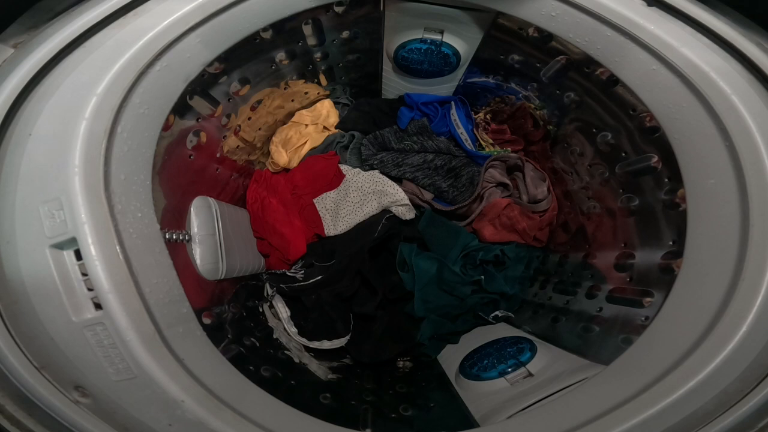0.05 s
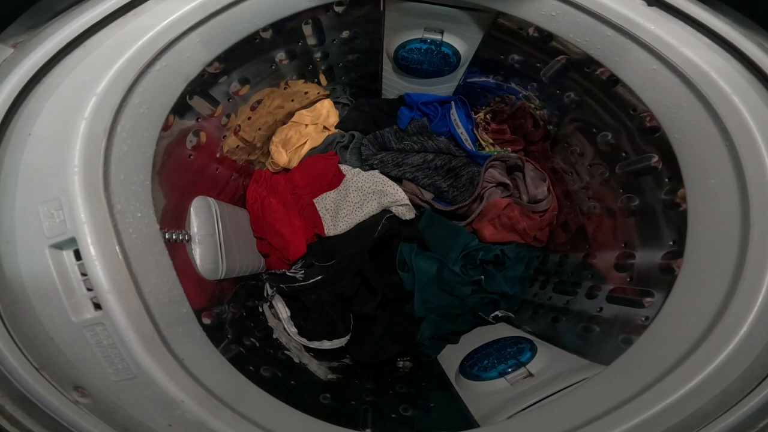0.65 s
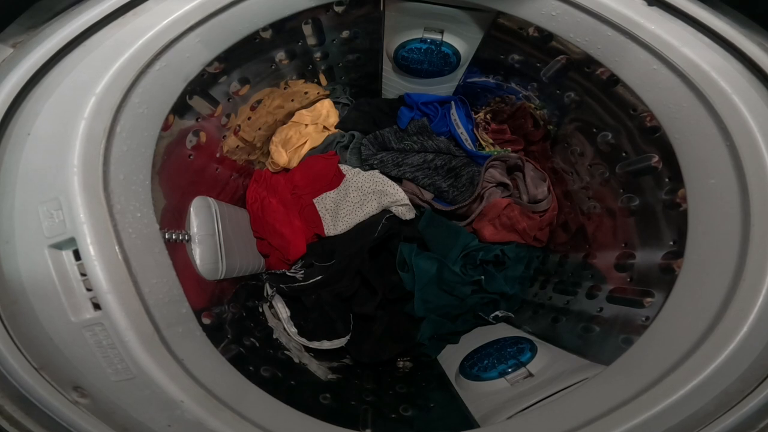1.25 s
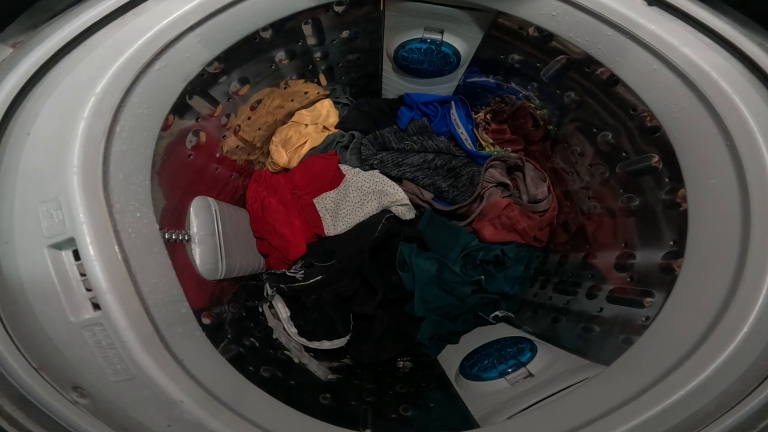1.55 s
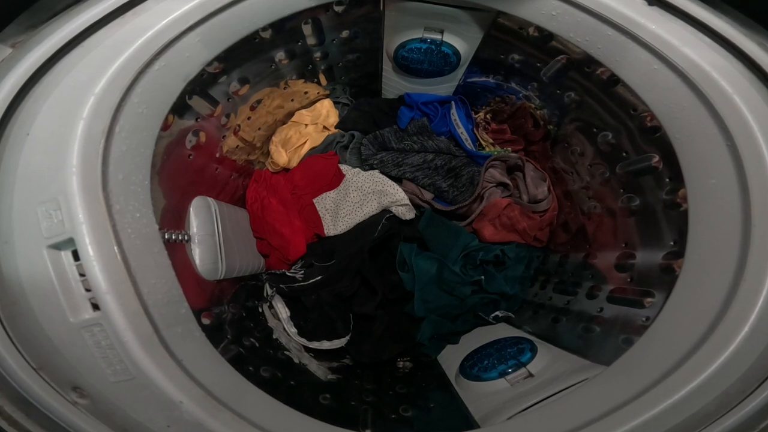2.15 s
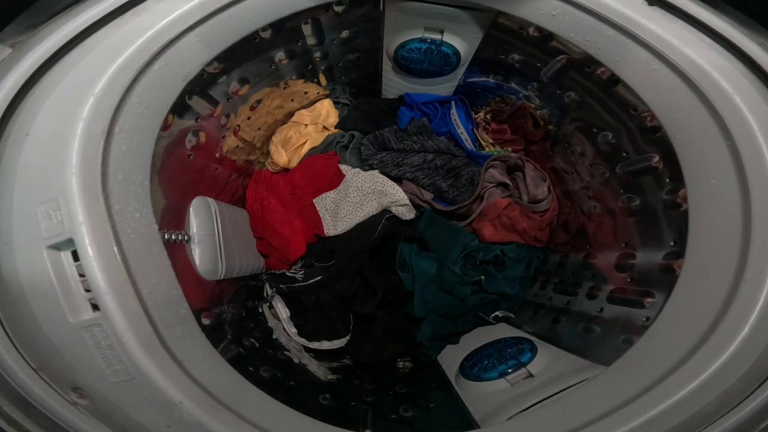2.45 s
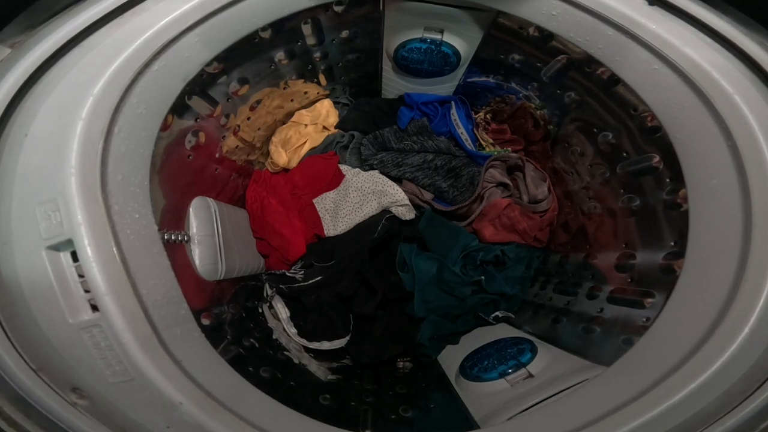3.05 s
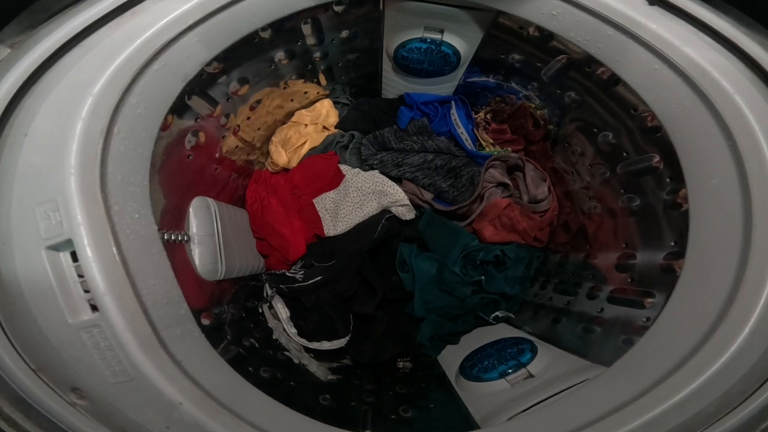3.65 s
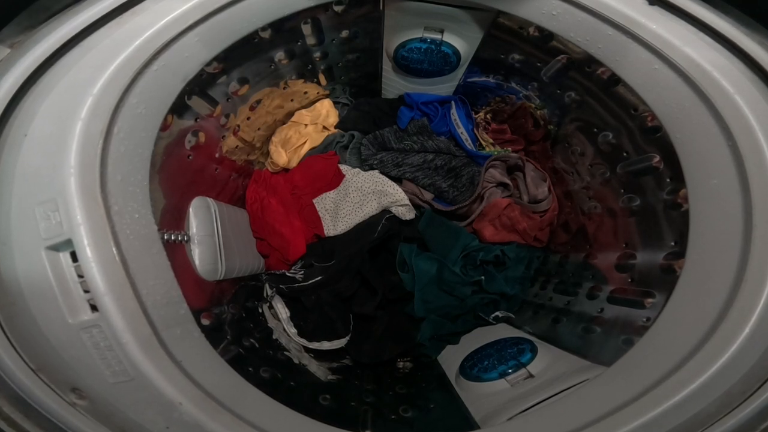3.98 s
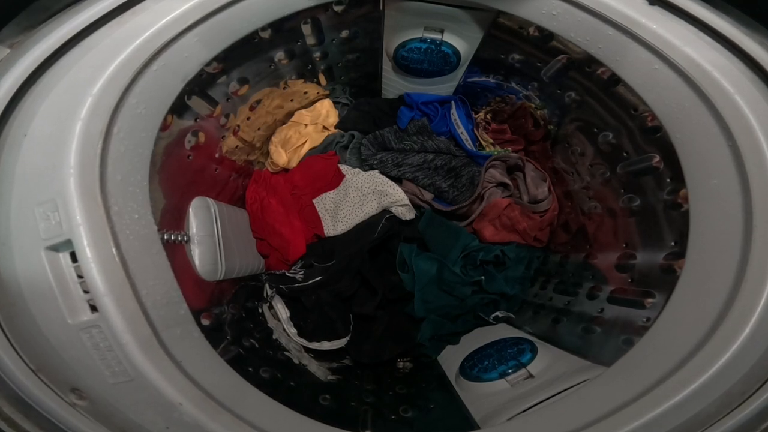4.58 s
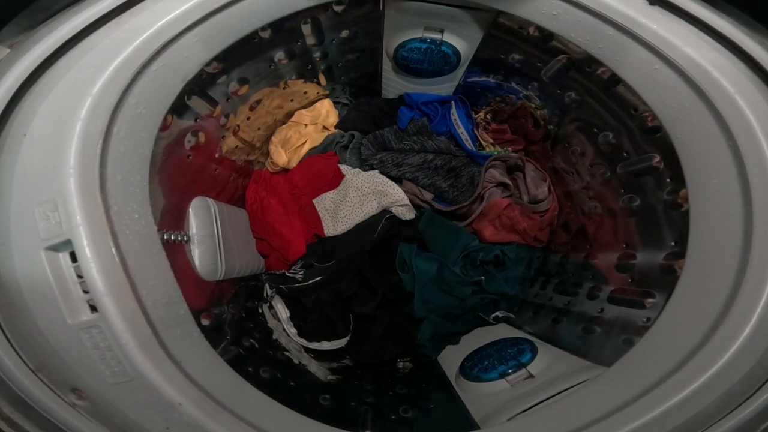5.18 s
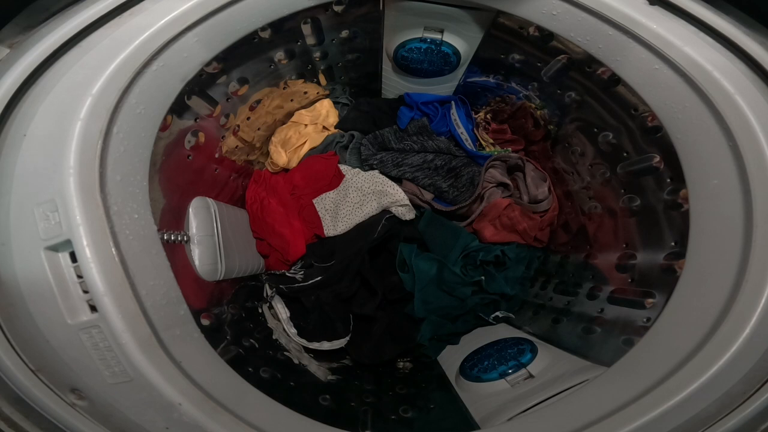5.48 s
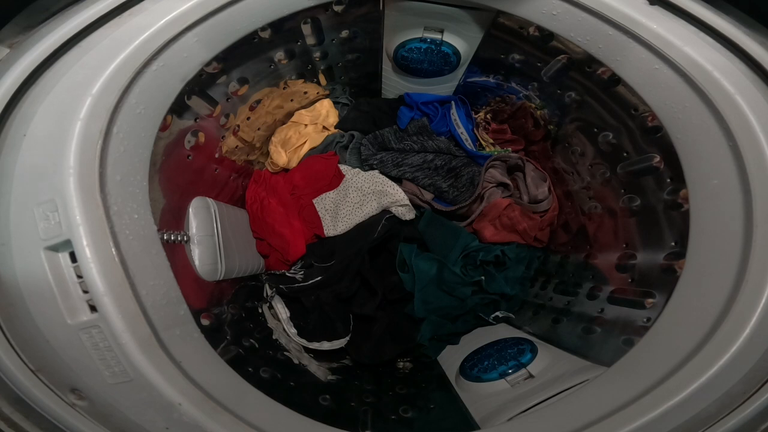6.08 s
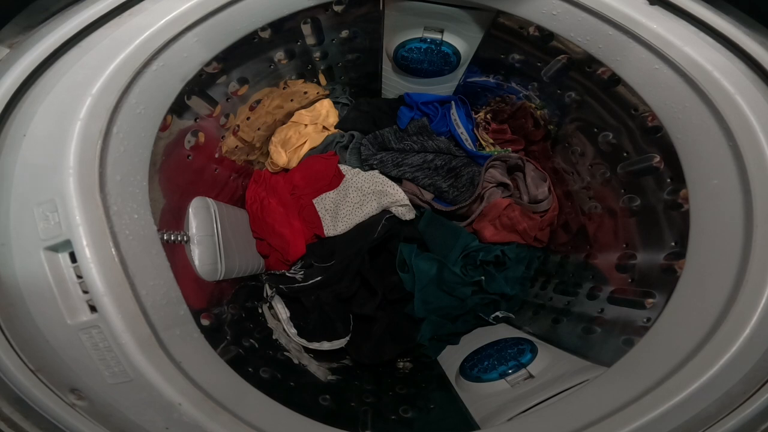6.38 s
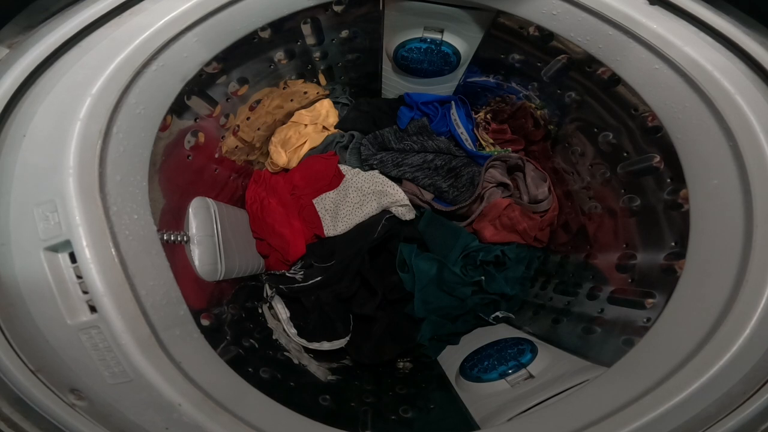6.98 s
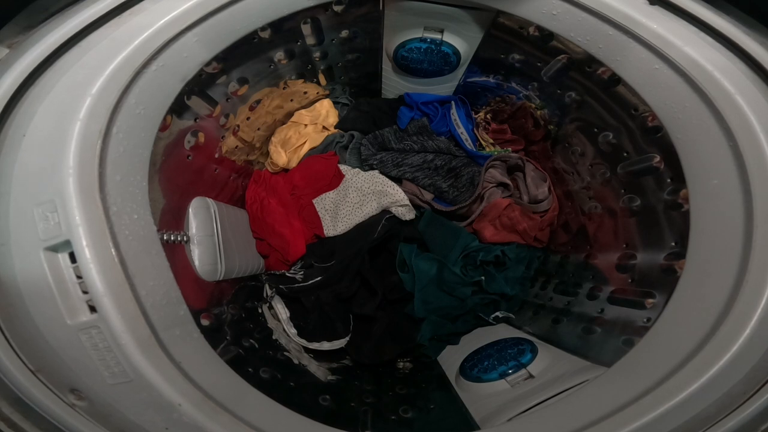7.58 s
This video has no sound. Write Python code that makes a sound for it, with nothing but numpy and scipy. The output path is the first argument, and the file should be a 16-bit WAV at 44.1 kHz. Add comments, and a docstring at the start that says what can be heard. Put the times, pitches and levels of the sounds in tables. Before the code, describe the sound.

Inside the drum of a top-loading washing machine, a few soft drips fall over a faint low murmur and hiss. From about 1.2 seconds the inlet sputters and water dribbles in with small slaps. At 2 seconds a jet arrives suddenly and loudly, drumming on the tub with a quick run of deep, hollow booms until about 2.7 seconds. The water keeps pouring over a low rumble, splashing on wet laundry and churning up ringing, gurgling bubbles, while spray ticks and tinkles on the steel basket. Stronger gushes come between 3.4 and 4.3 seconds. From about 5.3 seconds the flow breaks into uneven spurts and slaps, the spray thins, and small bubbles plip around 6 seconds. The inlet sputters again and the stream cuts off near 6.9 seconds. The tub rumbles briefly, and a few faint drips fall until about 7.5 seconds, leaving the quiet murmur.

```python
"""Washing machine filling

Water runs into a top-loading washer, heard from inside the drum. It dribbles first, then a jet
drums on the tub, splashes, churns up ringing bubbles and sprays the steel basket. The flow breaks
into slaps and stops; the tub rumbles on briefly and a few drips fall."""
import sys
import numpy as np
from scipy import signal
from scipy.fft import rfft, irfft, next_fast_len
from scipy.io import wavfile
from scipy.ndimage import map_coordinates

SR = 44100
rng = np.random.default_rng(int(sys.argv[2]) if len(sys.argv) > 2 else 0)


def store_pcm(level_fs):
    """Save levels as 16-bit WAV."""
    pcm = np.round(np.clip(level_fs, -1, 1) * 32767).astype(np.int16)
    wavfile.write(sys.argv[1], SR, np.atleast_2d(pcm).T)


N = 345303

# Stream strength. Each row: time in seconds, level in dB re nominal flow.
STREAM_DB = [(1.15, -40), (1.3, -26), (1.7, -18.5), (1.8, -13), (1.97, -15), (2.02, 4.5), (2.4, 1.5),
             (3.65, 1.5), (4.0, 1), (5.3, 3), (5.6, -3), (6.2, 0), (6.6, -2), (6.83, -1), (6.95, -25),
             (7.3, -22), (7.45, -46)]
# The stream swells. Each row: start in seconds, length in seconds, gain in dB.
STREAM_GUSHES = [(2.141, 0.019, -5.5), (3.424, 0.23, 2.5), (3.67, 0.11, 4), (3.997, 0.021, 9.5),
                 (4.263, 0.073, 3.5), (5.366, 0.045, 5), (5.778, 0.05, 5.5), (5.894, 0.023, 1),
                 (6.016, 0.06, 3), (6.138, 0.06, 4), (6.495, 0.035, 4.5), (6.752, 0.079, 4)]
# The stream thins or breaks. Each row: start in seconds, length in seconds, loss in dB.
STREAM_BREAKS = [(1.682, 0.089, 13), (2.417, 0.014, 5.5), (2.897, 0.15, 1), (3.287, 0.019, 2),
                 (3.848, 0.03, 0.5), (4.227, 0.017, 4), (4.363, 0.024, 6.5), (4.49, 0.13, 6),
                 (5.33, 0.019, 21), (5.494, 0.029, 8.5), (5.637, 0.036, 2.5), (5.727, 0.027, 8.5),
                 (6.219, 0.025, 10.5), (6.298, 0.18, 6.5), (6.54, 0.036, 9.5), (6.688, 0.02, 7)]
# Bubble cloud under the jet. Each row: time in seconds, relative level in dB, pitch in Hz.
CHURN_TRACK = [(1.8, -44.5, 967), (2.2, -38, 915), (2.5, -29.5, 899), (2.9, -34.5, 951), (3.36, -34, 963),
               (3.47, -31.5, 1072), (3.9, -36, 1135), (4.2, -31.5, 1081), (4.6, -36.5, 1199),
               (5.2, -48, 986), (6.9, -49, 1032)]
# Droplet pitch, set by size. Each row: time in seconds, pitch in Hz.
DROPLET_HZ = [(2.1, 4610), (4.5, 4820), (6.0, 5753), (7.0, 7040)]

# Level curves. Each row: time in seconds, relative level in dB.
FOAM_DB = [(1.5, -42), (2.1, -49.5), (3.35, -52.5), (3.5, -42.5), (3.75, -42), (4.1, -48.5), (5.2, -47.5),
           (6.8, -53.5)]
SPRAY_DB = [(1.9, -66), (2.2, -59.5), (2.4, -48), (3.1, -46.5), (3.6, -50.5), (4.3, -45), (5.3, -50.5),
            (6.0, -59.5), (6.8, -63.5), (7.3, -68)]  # shrinks as the water deepens
TINKLE_DB = [(1.7, -110), (1.95, -75), (2.2, -68), (2.35, -51.5), (3.5, -50.5), (4.2, -51), (5.3, -50),
             (6.2, -60.5), (6.38, -59.5), (6.6, -58.5), (6.85, -62), (6.95, -91), (7.4, -80), (7.7, -105)]
INLET_DB = [(1.2, -105), (1.25, -70), (1.65, -64.5), (1.75, -73), (1.86, -58), (2.07, -56), (2.55, -56),
            (2.75, -63), (6.0, -71.5), (6.3, -69), (6.6, -58.5), (6.85, -58.5), (6.94, -88.5)]

# Lumps landing. Each row: start in seconds, relative peak in dB, centre in Hz, width in octaves.
SLAP_HITS = [(.022, -57, 720, .3), (.085, -44.5, 537, 0.32), (.157, -44.5, 340, 0.45),
             (.18, -44, 290, 0.45), (0.223, -58, 1010, 0.28), (.255, -62, 2300, .4), (.728, -57, 2350, .35),
             (1.245, -43.5, 2240, 0.81), (1.301, -37.5, 1230, 0.7), (1.376, -48.5, 1310, 1),
             (1.434, -38.5, 950, 0.19), (1.492, -44, 790, .6), (1.522, -46, 1500, 0.98),
             (1.555, -40.5, 1340, 0.84), (1.62, -44, 1280, 1), (1.77, -32.5, 1390, 0.6),
             (1.804, -36, 1064, 0.17), (1.853, -37, 1120, 0.38), (1.858, -38, 475, 0.76),
             (1.898, -33.5, 1120, 0.7), (1.974, -37.5, 1980, 0.65), (2.014, -26, 422, 0.6),
             (2.055, -24.5, 535, 0.64), (2.121, -21, 593, 0.6), (2.146, -20, 630, 0.78),
             (2.186, -20, 630, 0.97), (2.442, -30, 753, 0.4), (2.489, -23.5, 847, 0.12),
             (2.818, -20, 890, 0.23), (3.043, -24.5, 916, 0.18), (3.114, -21, 828, 0.62),
             (3.218, -23, 910, 0.23), (3.343, -22, 966, 0.2), (3.485, -22, 1134, 0.32),
             (3.587, -21.5, 1044, 0.19), (3.712, -20, 1240, 0.95), (3.915, -20.5, 1135, 0.24),
             (3.949, -34, 1135, 0.23), (3.985, -18, 1180, 0.25), (4.012, -15, 1123, 0.29),
             (4.121, -17.5, 1043, 0.32), (4.171, -15, 1090, 0.31), (4.279, -22.5, 1094, 0.24),
             (4.364, -25.5, 1104, 0.54), (4.404, -38, 1098, .5), (4.627, -26.5, 1185, 0.47),
             (4.681, -22.5, 1010, .5), (4.72, -24, 950, 0.17), (5.3, -20, 740, 0.75),
             (5.372, -26, 764, 0.66), (5.478, -29.5, 794, 0.7), (5.547, -26, 682, 0.95),
             (5.698, -30, 803, 0.24), (5.787, -27, 1090, 0.47), (5.913, -27, 960, .25),
             (6.195, -29.5, 1000, .6), (6.265, -27, 955, 0.65), (6.283, -33.5, 1200, .6),
             (6.508, -25.5, 987, 0.2), (6.774, -30, 1290, 0.41), (7.286, -46, 1310, 0.56)]
# Spurts on the steel. Each row: start in seconds, relative level in dB.
SPURT_HITS = [(1.852, -60.5), (1.897, -57), (1.973, -57), (2.054, -34), (2.137, -44), (2.177, -39),
              (2.239, -43), (2.325, -42), (2.359, -41), (2.402, -33.5), (2.459, -37.5), (2.55, -35.5),
              (2.616, -28.5), (2.695, -47.5), (2.726, -38.5), (2.77, -29.5), (2.847, -36.5), (3.058, -34),
              (3.084, -32.5), (3.137, -56), (3.259, -29), (3.344, -45), (3.448, -32.5), (3.487, -26),
              (3.548, -30), (3.6, -37), (3.706, -26), (3.74, -34.5), (3.83, -39.5), (4.014, -39),
              (4.266, -37), (4.309, -40.5), (4.43, -47), (4.523, -38.5), (4.69, -47.5), (4.786, -41.5),
              (4.885, -46), (4.959, -42.5), (4.991, -41), (5.028, -39.5), (5.21, -41.5), (5.299, -37),
              (5.37, -34), (5.392, -39.5), (5.545, -40), (5.617, -39.5), (5.698, -50), (5.786, -45),
              (5.889, -41), (5.969, -44), (6.046, -51), (6.129, -46), (6.19, -46.5), (6.26, -43),
              (6.283, -56), (6.476, -51), (6.51, -61), (6.76, -56), (7.096, -62.5), (7.12, -64)]
# Pitched events. Each row: start in seconds, relative peak in dB, pitch in Hz.
BOOM_HITS = [(1.319, -54, 159), (1.566, -37, 144), (1.777, -31, 147), (1.816, -37, 139),
             (2.012, -10.5, 150.5), (2.067, -15, 147), (2.118, -21, 143.3), (2.192, -9.5, 151),
             (2.24, -19, 140.4), (2.281, -12.5, 134.8), (2.342, -16, 119.7), (2.484, -13, 151),
             (2.601, -20.5, 136), (2.655, -18, 142)]
DRIP_HITS = [(0.084, -50, 513), (0.124, -47, 1035), (.155, -43.5, 369), (.175, -43, 254), (.226, -50, 475),
             (5.88, -40, 1880), (6.001, -35, 1730), (6.031, -35, 1840), (6.161, -32, 1634),
             (6.177, -43, 1660), (6.28, -33.5, 1900), (6.922, -54.5, 6800), (7.012, -59, 1600),
             (7.018, -55, 6800), (7.07, -55, 1620), (7.109, -55, 1280), (7.278, -51, 1614),
             (7.135, -61, 7200), (7.324, -58, 7100), (7.44, -55.5, 6600)]

# Resonances. Each row: frequency in Hz, bandwidth in Hz, gain in dB.
AIR_MODES = [(228, 33, -1), (287, 19, -3), (344, 14, 0), (413, 57, -1), (541, 24, 5), (588, 35, -2),
             (648, 35, -3), (697, 45, 1), (850, 23, -4), (938, 75, -2), (1022, 62, -4), (1078, 19, 0),
             (1138, 18, -2), (1210, 39, 1), (1265, 34, -4), (1403, 24, 0), (1484, 36, 3), (1636, 40, 1),
             (1706, 65, -5), (1900, 40, -1), (2032, 50, -4), (2175, 50, -3), (2335, 49, 3), (2550, 90, -1)]  # air in the drum
TUB_MODES = [(98, 18, -8.5), (121.6, 25, -6.5), (138.8, 14, -0.5), (168.6, 8.3, 1)]
BASKET_MODES = [(2937, 34, -12), (3070, 80, -9), (3475, 31, -10), (3687, 14, -12), (3785, 32, 3),
                (3850, 64, -6), (3965, 140, -6), (4323, 35, -1), (4584, 78, -8), (4758, 73, -3),
                (4850, 31, -8), (5126, 48, -7), (5241, 36, -8), (5337, 52, -1), (5415, 38, -8),
                (5873, 54, -8), (6138, 57, -9), (6477, 97, -7), (6876, 52, -8), (7102, 153, 1),
                (7292, 34, -3), (7523, 45, -12), (7858, 94, -9), (8350, 60, -12)]
CLEAR_MODES = [(3780, 26, 0), (3860, 90, -4), (4328, 40, -4)]  # the basket's clearest
HIGH_MODES = [(4325, 35, -3), (4570, 70, -9), (4765, 70, -6), (5135, 45, -7), (5335, 50, -1),
              (5420, 45, -6), (5870, 45, -10), (6476, 50, -12), (6872, 35, -8), (7125, 90, -1),
              (7295, 35, -3)]  # the basket's high ones

# Spectral shapes. Each row: frequency in Hz, gain in dB.
SPLASH_EQ = [(100, -48.5), (200, 2.5), (350, 3), (700, -5.5), (900, -2), (1400, -17.5), (2000, -36),
             (3000, -34), (8000, -76)]
FOAM_EQ = [(600, -55.5), (1200, 0.5), (1500, 10), (1750, -2), (2100, -7), (2600, -8), (3200, -6.5),
           (5000, -24), (9000, -40.5), (12500, -61.5)]
PANEL_EQ = [(50, -22), (80, -8.5), (110, -1), (175, 0.5), (205, -10.5), (240, -10.5), (290, -27.5),
            (600, -71.5)]
HEAVE_EQ = [(10, -32.5), (25, -11), (36, -16), (50, -2), (75, -11), (100, -6), (160, -60), (300, -100)]
SPRAY_EQ = [(1200, -70), (2500, -22), (3100, -3.5), (3700, -5), (5400, -6), (7400, -7), (8000, -12.5),
            (9200, -13), (10200, -29.5), (12500, -23), (14000, -67)]
SPURT_EQ = [(2200, 6), (3100, -3), (3900, 5.5), (5000, 3), (7300, 1), (9000, -6)]  # re the even spray
INLET_EQ = [(1000, -34.5), (1900, 3.5), (2350, 4), (2600, -1.5), (3300, -21), (4500, -6), (8000, -12),
            (11000, -40), (13000, -58.5)]
MURMUR_EQ = [(12, -38), (20, -27), (41, 5), (81, -11), (113, -0.5), (150, 0.5), (182, -7.5), (200, -16.5),
             (247, -20), (300, -37.5), (390, -60), (660, -120)]
ROOM_EQ = [(60, -3), (200, 1), (300, -3), (500, -7.5), (750, -16), (1200, -11.5), (1750, -6.5),
           (2400, -13.5), (2750, -18.5), (3400, -10), (4500, -22.5), (7000, -20), (8500, -21.5),
           (11000, -43), (13900, -57.5)]

# Stereo image. Each row: frequency in Hz, gain in dB.
BALANCE_EQ = [(30, -10), (140, -7.5), (300, -1), (520, -0.5), (660, 8), (800, -1.5), (1000, 4.5), (1800, 4),
              (2200, 1), (3600, -1), (4000, -6), (4500, -1), (7000, 0)]  # left minus right
SIDE_ECHO_EQ = [(50, -49.5), (150, -34.5), (280, -15.5), (500, -9), (1500, -18.5), (2300, -10), (3000, 1.5),
                (4200, -6.5), (7000, -18), (12000, -14.5)]  # echo in the side channel
ROOM_SIDE_EQ = [(50, -20), (120, 6.5), (200, 2.5), (300, -1), (1000, -1), (1700, -5), (3000, -6),
                (5000, -6), (9000, -11), (12000, 12.5)]  # side minus mid


def splash(lumps, surge, fine_surge, splash_db=-38, foam_db=-2):
    """Heavy drops land on water and wet cloth; foam crackles around them."""
    heavy = driven(patter(1200, 5.8) * lumps, flow() * surge,
                   lambda hz: colour(SPLASH_EQ, hz) * resonances(AIR_MODES, hz))
    foam = driven(patter(1600, 4.2) * lumps, flow() * fine_surge * amp(curve(FOAM_DB)),
                  lambda hz: colour(FOAM_EQ, hz) * resonances(AIR_MODES, hz))
    return amp(splash_db) * heavy + amp(foam_db) * foam


def churn(lumps, surge, gain_db=-2.5, wander=0.02):
    """A cloud of like-sized bubbles gurgles where the jet plunges in."""
    pitch_hz = curve(CHURN_TRACK, column=2) * (1 + wander * wobble(knots_per_s=14))
    gurgle = cloud(pitch_hz, scatter=0.058, cycles=4.4, rise=0.016, spread_db=3, count=2600, samples=1200)
    gain = flow() * surge * amp(curve(CHURN_TRACK))
    return amp(gain_db) * driven(gurgle * lumps, gain, lambda hz: resonances(AIR_MODES, hz, direct=0.072))


def slaps(gain_db=-1, attack_s=0.0015, fade_s=0.0125):
    """Lumps of water smack on cloth and pool and ring the drum's air."""
    track, t = np.zeros(N), np.arange(SR // 5) / SR
    hz = np.fft.rfftfreq(len(t), 1 / SR) + 1
    air = resonances(AIR_MODES, hz, direct=0.4)
    for start_s, db, centre_hz, octaves in SLAP_HITS:
        burst = rng.standard_normal(len(t)) * pulse(t, attack_s, fade_s)
        band = 1 / (1 + 1j * (hz / centre_hz - centre_hz / hz) / octaves / 2) ** 4
        smack = irfft(rfft(burst) * air * band)
        add(track, start_s, amp(db + gain_db) * smack / np.abs(smack).max())
    return track


def rumble(surge, panel_db=-25.5, heave_db=-27.5, knee_db=-7.5, arrival_s=2.02, heave_lag_s=0.029):
    """The jet drums on the tub's panels, hardest on arrival, and rocks the mass of water."""
    t = np.arange(N) / SR
    drive = flow() / np.hypot(flow(), amp(knee_db))  # saturates above the knee
    panels = unit(filtered(patter(2500, 0.92),
                           lambda hz: colour(PANEL_EQ, hz) * resonances(TUB_MODES, hz, direct=0.56)))
    arrival_db = 10 * (t > arrival_s) * np.exp(-((t - arrival_s) / 0.18) ** 2)
    panel_gain = settled(amp(arrival_db) * drive ** 1.64 * surge ** 0.72, settle_s=0.045)
    heave = unit(filtered(patter(800, 1), lambda hz: colour(HEAVE_EQ, hz)))
    heave_gain = settled(np.interp(t - heave_lag_s, t, drive) ** 1.23, settle_s=0.082)
    inertia_db = np.interp(t, [2.3, 2.377], [-7, 0])  # the mass of water is slow to start rocking
    return amp(panel_db) * panel_gain * panels + amp(heave_db + inertia_db) * heave_gain * heave


def booms(gain_db=-2, sag=0.046, attack_s=0.01, fade_s=0.034):
    """The jet's first weight rings the tub's wall, which sags in pitch under the load."""
    track, t = np.zeros(N), np.arange(SR // 3) / SR
    envelope = pulse(t, attack_s, fade_s)
    for start_s, db, hz in BOOM_HITS:
        phase = 2 * np.pi * hz * t * (1 - sag * np.tanh(t / fade_s / 2))
        add(track, start_s, amp(db + gain_db) * np.sin(phase) * envelope / envelope.max())
    return track


def spray(lumps, fine_surge, gain_db=-5, ring_db=-3, graze_s=3.27, muffle_db_per_s=12.5):
    """Droplets tick and plink on the basket; a graze swells its ring, then rising water damps it."""
    gain = amp(gain_db + curve(SPRAY_DB)) * flow() * fine_surge
    plinks = cloud(curve(DROPLET_HZ), scatter=0.236, cycles=11, rise=0.0045, spread_db=-5,
                   count=9000, samples=300)
    drops = (unit(plinks) + unit(patter(2600, 3.3))) * lumps
    ticks = driven(drops, gain, lambda hz: steel(BASKET_MODES, hz, direct=0.1))
    ring = unit(filtered(drops, lambda hz: resonances(CLEAR_MODES, hz) ** 2))
    since_s = np.arange(N) / SR - graze_s
    graze_db = 10 * np.exp(-np.abs(since_s) / 0.08)
    muffle_db = muffle_db_per_s * np.maximum(since_s, 0)
    return ticks + amp(ring_db + graze_db - muffle_db) * gain * ring


def spurts(gain_db=-2, plink_hz=4915, plink_db=-3, grain_db=5, air_db=-15, attack_s=0.0092, fade_s=0.0081):
    """Handfuls of droplets ring the basket and the air inside it; weaker stragglers trail each."""
    track, t = np.zeros(N), np.arange(SR // 8) / SR
    hz = np.fft.rfftfreq(len(t), 1 / SR)
    upper_air = resonances([mode for mode in AIR_MODES if mode[0] > 1800], hz)
    body = (steel(BASKET_MODES, hz, direct=0.08) + amp(air_db) * upper_air) * colour(SPURT_EQ, hz)
    envelope = pulse(t, attack_s, fade_s)
    gain = amp(gain_db) * np.std(envelope) / envelope.max()
    for start_s, db in SPURT_HITS:
        for late_s, trail_db in [(0, 0), (0.018 * (0.5 + rng.random()), -8.5)]:
            noise, size = rng.standard_normal((2, len(t)))
            grains = unit(noise * amp(grain_db * size) * envelope)
            age_s = np.maximum(t - 2 * fade_s * rng.random((7, 1)), 0)
            pitch_hz = plink_hz * np.exp(0.1776 * np.clip(rng.standard_normal((7, 1)), -2, 2))
            plinks = unit(bubble(age_s, pitch_hz, cycles=10, rise=0).sum(axis=0))
            burst = irfft(rfft(grains + amp(plink_db) * plinks) * body)
            add(track, start_s + late_s, gain * amp(db + trail_db) * unit(burst))
    return track


def tinkle(surge):
    """Flurries of fine drops ring the basket's high modes."""
    flurries = clumps(per_s=45, life_s=0.014, steady=0.3)
    drops = cloud(curve(DROPLET_HZ), scatter=0.224, cycles=5, rise=0, spread_db=4.2,
                  count=3800, samples=300)
    ringing = filtered(drops * surge * flurries, lambda hz: steel(HIGH_MODES, hz, direct=0.11))
    return amp(curve(TINKLE_DB)) * unit(ringing)


def glugs(surge, glug_hz=1198, glug_db=-49, plop_hz=629, plop_db=-51):
    """Small and large bubbles in the pool merge into a slosh and ring the drum's air."""
    small = cloud(np.full(N, glug_hz), scatter=0.24, cycles=6, rise=0.015, spread_db=3,
                  count=2400, samples=1200)
    large = cloud(np.full(N, plop_hz), scatter=0.33, cycles=4, rise=0.015, spread_db=4,
                  count=1100, samples=1600)
    slosh = amp(glug_db) * unit(small) + amp(plop_db) * unit(large)
    return np.std(slosh) * driven(slosh, flow() * surge, lambda hz: resonances(AIR_MODES, hz, direct=0.14))


def drips(gain_db=-1, cycles=8, rise=0.018, shed_within_s=0.023):
    """Single bubbles plip in the pool, each shedding three weaker ones; the drum's air rings."""
    track, t = np.zeros(N), np.arange(SR // 4) / SR
    air = resonances(AIR_MODES, np.fft.rfftfreq(len(t), 1 / SR), direct=0.44)
    for start_s, db, hz in DRIP_HITS:
        plip = bubble(t, hz, cycles, rise)
        for delay, detune in rng.random((3, 2)):
            shed_hz = hz * (1 + 0.31 * (detune - 0.5))
            add(plip, shed_within_s * delay, 0.55 * bubble(t, shed_hz, cycles / 2, rise))
        plip = irfft(rfft(plip) * air)
        add(track, start_s, amp(db + gain_db) * plip / np.abs(plip).max())
    return track


def inlet(lumps):
    """Air sputters in the inlet as the pipe fills and again as it empties."""
    sputter = filtered(patter(4400, 13) * lumps,
                       lambda hz: colour(INLET_EQ, hz) * resonances(AIR_MODES, hz, direct=0.48))
    return amp(curve(INLET_DB)) * unit(sputter)


def murmur(level_db=-49, sway_db=2, period_s=1, trough_s=0.86):
    """The resting machine's low murmur swells and sinks."""
    sway = -np.cos(2 * np.pi * (np.arange(N) / SR - trough_s) / period_s)
    noise = unit(filtered(rng.standard_normal(N), lambda hz: amp(along(MURMUR_EQ, hz))))
    return amp(level_db + sway_db * sway) * noise


def room(level_db=-64):
    """Faint stereo hiss of the laundry room, diffuse above the bass."""
    mid, side = filtered(rng.standard_normal((2, N)),
                         lambda hz: amp([along(ROOM_EQ, hz), along(ROOM_EQ, hz) + along(ROOM_SIDE_EQ, hz)]))
    return amp(level_db) * unit(np.array([mid + side, mid - side]))


def flow():
    """Stream strength, 1 at nominal flow."""
    return amp(curve(STREAM_DB))


def gushes_and_breaks(rise_s=0.02, fall_s=0.0074):
    """Gain of the uneven stream, which falls faster than it rises."""
    t = np.arange(N) / SR

    def gate(start_s, length_s, in_s, out_s):
        return np.clip((t - start_s) / in_s, 0, 1) * np.clip(1 - (t - start_s - length_s) / out_s, 0, 1)

    gush_db = sum(db * gate(s, length_s, rise_s, fall_s) for s, length_s, db in STREAM_GUSHES)
    loss_db = sum(db * gate(s, length_s, fall_s, rise_s) for s, length_s, db in STREAM_BREAKS)
    return amp(gush_db - loss_db)


def patter(per_s, spread_db):
    """Randomly timed impacts of uneven size."""
    chance, size, sign = rng.random(N), rng.standard_normal(N), rng.choice([-1, 1], N)
    return (chance < per_s / SR) * sign * amp(spread_db * np.clip(size, -2, 2))


def clumps(per_s, life_s, steady):
    """Gain of water arriving in lumps: jumps that die away, over a steady share of the power."""
    power = signal.lfilter([1], [1, -np.exp(-2 / (life_s * SR))], patter(per_s, 2) ** 2)
    return np.sqrt(steady + (1 - steady) * power / power.mean())


def bubble(t, hz, cycles, rise):
    """A bubble rings and climbs in pitch as it nears the surface."""
    life_s = cycles / hz
    phase = 2 * np.pi * hz * t * (1 + rise * np.tanh(t / life_s / 2))
    return np.sin(phase) * pulse(t, 1 / hz, life_s)


def cloud(centre_hz, scatter, cycles, rise, spread_db, count, samples):
    """Many bubbles of random start, pitch, life and strength."""
    life, strength, pitch = np.clip(rng.standard_normal((count, 3)), -2, 2).T
    start, offset = rng.integers(0, N, count), np.arange(samples)
    hz = centre_hz[start] * np.exp(scatter * pitch)
    rings = bubble(offset / SR, hz[:, None], cycles * amp(2 * life)[:, None], rise)
    rings *= amp(spread_db * strength)[:, None]
    return np.bincount((start[:, None] + offset).ravel(), rings.ravel(), minlength=N)[:N]


def resonances(modes, hz, direct=0):
    """Response of parallel resonances plus a direct path."""
    f = np.arange(0, SR / 2, 2)
    response = sum(amp(db) * 1j * f * width / (centre ** 2 - f ** 2 + 1j * f * width)
                   for centre, width, db in modes)
    return direct + np.interp(hz, f, response)


def steel(modes, hz, direct):
    """The basket's response to a droplet."""
    return colour(SPRAY_EQ, hz) * resonances(modes, hz, direct)


def echoes(x, t60_s):
    """Short dense tail from the drum's walls."""
    t = np.arange(SR // 3) / SR
    tail = rng.standard_normal(len(t)) * amp(-60 * t / t60_s) * (t > 0.002)
    return signal.fftconvolve(x, tail / np.linalg.norm(tail))[:N]


def settled(drive, settle_s):
    """Level of a body that stores its drive's energy and releases it slowly."""
    keep = np.exp(-1 / (settle_s * SR))
    return np.sqrt(signal.lfilter([1 - keep], [1, -keep], drive ** 2))


def driven(excitation, gain, response):
    """Filter excitation * gain, scaled so that gain 1 gives rms 1."""
    steady, played = filtered(np.array([excitation, excitation * gain]), response)
    return played / np.std(steady)


def filtered(x, response):
    """Apply a complex response, a function of Hz."""
    size = 2 * next_fast_len(N // 2 + SR // 4)
    return irfft(rfft(x, size) * response(np.fft.rfftfreq(size, 1 / SR)), size)[..., :N]


def colour(points, hz):
    """Minimum-phase response through (Hz, dB) points."""
    cepstrum = irfft(np.log(amp(along(points, hz))))
    half = len(cepstrum) // 2
    cepstrum[1:half] *= 2
    cepstrum[half + 1:] = 0
    return np.exp(rfft(cepstrum))


def along(points, hz):
    """Read (Hz, dB) points on a log frequency axis."""
    point_hz, db = np.transpose(points)
    return np.interp(np.log(hz + 1), np.log(point_hz + 1), db)


def curve(rows, column=1):
    """One column of a time table, per sample."""
    rows = np.asarray(rows)
    return np.interp(np.arange(N) / SR, rows[:, 0], rows[:, column])


def wobble(knots_per_s):
    """Smooth random curve."""
    return map_coordinates(rng.standard_normal(400), [np.arange(N) * knots_per_s / SR], mode="wrap")


def pulse(t, attack_s, fade_s):
    """Exponential attack and decay."""
    return np.exp(-t / fade_s) * (1 - np.exp(-t / attack_s))


def add(track, start_s, sound):
    """Mix a sound into a track."""
    part = track[round(start_s * SR):][:len(sound)]
    part += sound[:len(part)]


def amp(db):
    """Decibels to gain."""
    return 10 ** (np.asarray(db) / 20)


def unit(x):
    """Scale to rms 1."""
    return x / np.sqrt(np.mean(x ** 2) + 1e-20)


def scene(echo_db=-10):
    """Water falls left of centre; the drum's echoes reach the two sides differently."""
    lumps = clumps(per_s=80, life_s=0.023, steady=0.19)
    fine_lumps = unit(np.sqrt(lumps) * clumps(per_s=65, life_s=0.022, steady=0.28))
    surge = gushes_and_breaks()
    fine_surge = surge ** 1.7  # foam and spray swing further than the stream
    water = splash(lumps, surge, fine_surge) + churn(np.sqrt(lumps), surge) + inlet(lumps) + slaps()
    water += spray(fine_lumps, fine_surge) + spurts() + tinkle(surge) + glugs(surge) + drips()
    tub = rumble(surge) + booms() + murmur()
    mid = water + amp(echo_db) * echoes(water, t60_s=0.26)
    side = filtered(echoes(water + tub, t60_s=0.071), lambda hz: amp(along(SIDE_ECHO_EQ, hz)))
    stereo = filtered(np.array([mid + side, mid - side]),
                      lambda hz: amp(np.outer([0.5, -0.5], along(BALANCE_EQ, hz))))
    return stereo + tub + room()  # the tub's long waves reach both sides alike


def record(dry):
    """Brick-wall low-pass at 13.6 kHz."""
    return filtered(dry, lambda hz: hz < 13600)


dry = scene()
out = record(dry)
store_pcm(out)
```